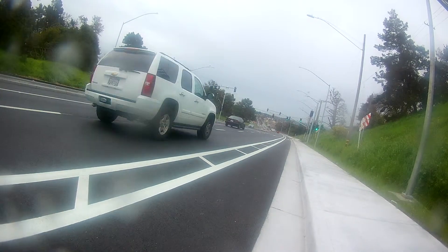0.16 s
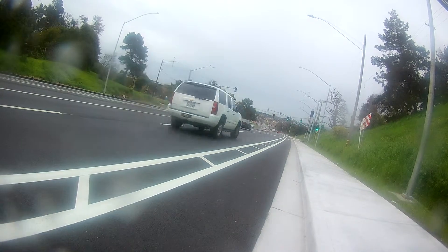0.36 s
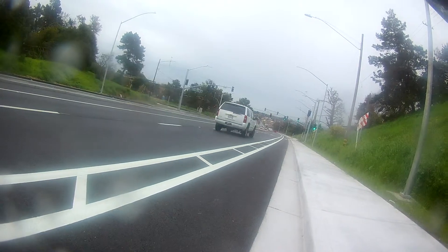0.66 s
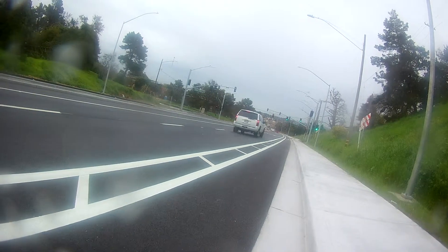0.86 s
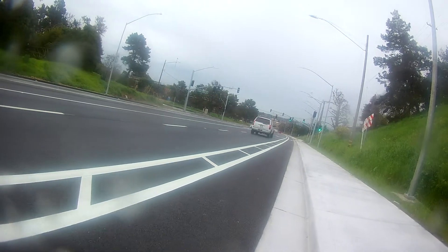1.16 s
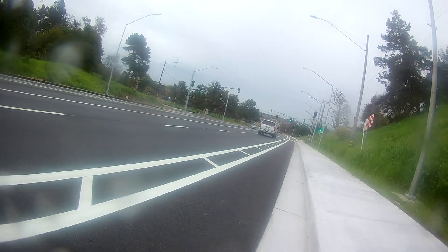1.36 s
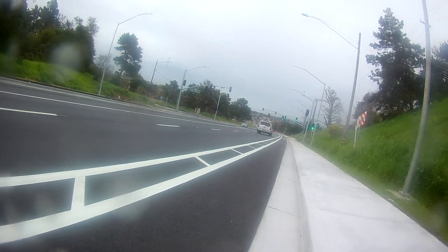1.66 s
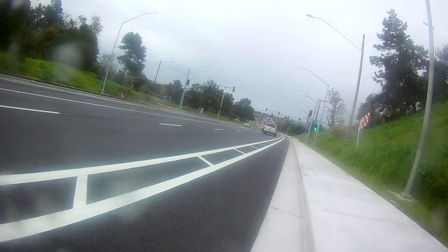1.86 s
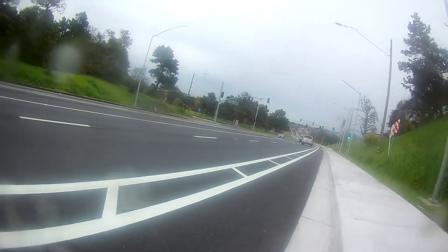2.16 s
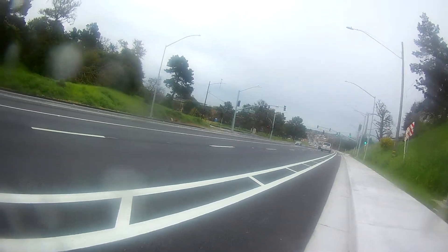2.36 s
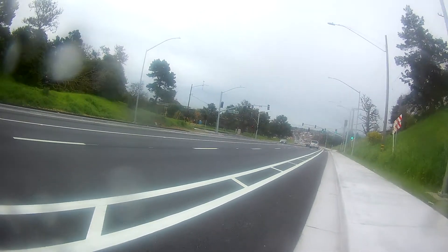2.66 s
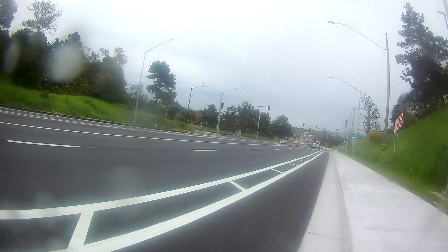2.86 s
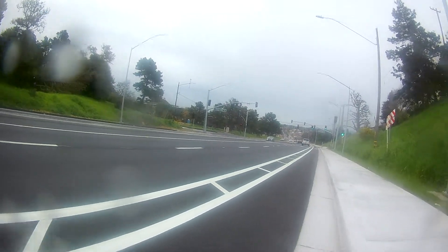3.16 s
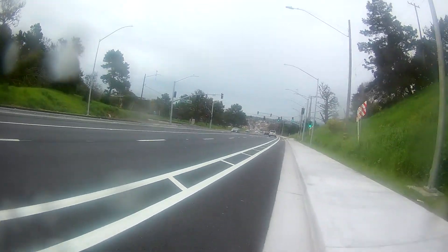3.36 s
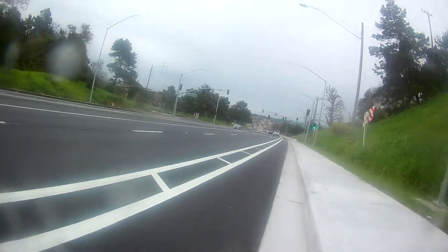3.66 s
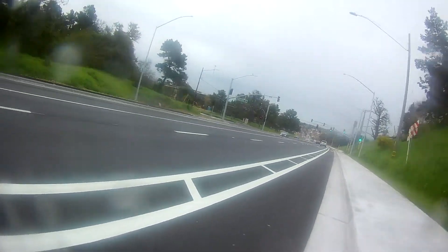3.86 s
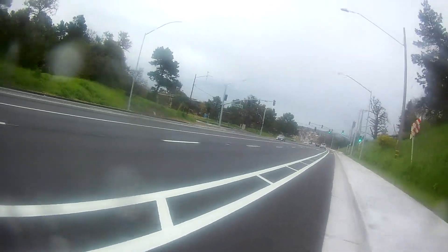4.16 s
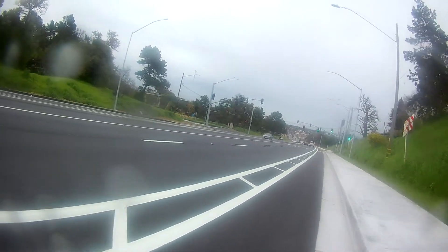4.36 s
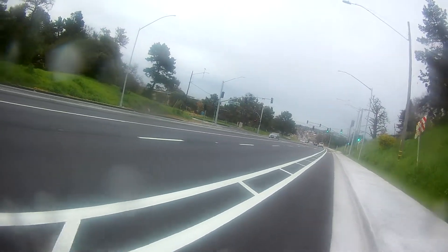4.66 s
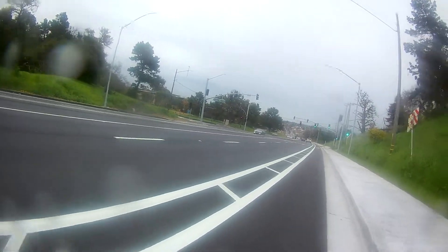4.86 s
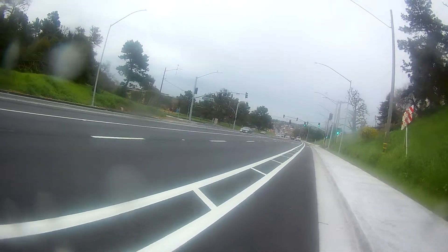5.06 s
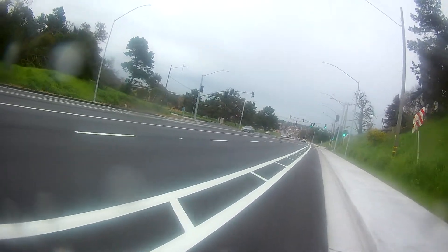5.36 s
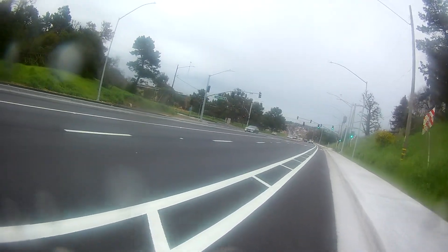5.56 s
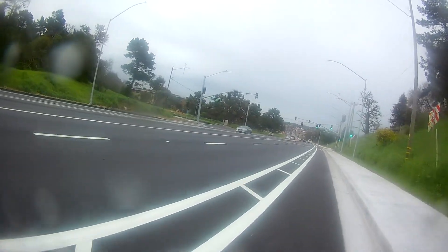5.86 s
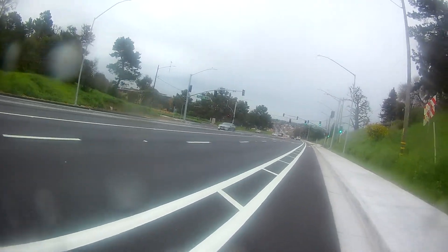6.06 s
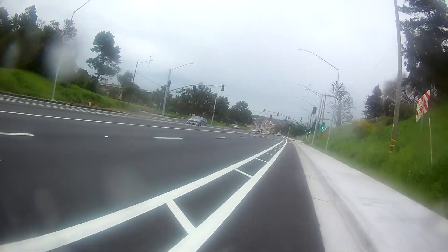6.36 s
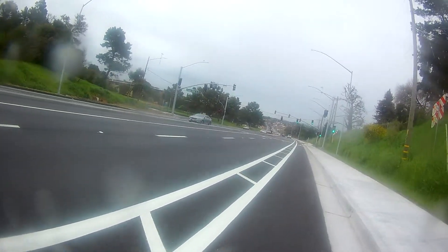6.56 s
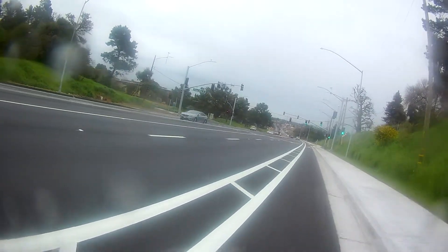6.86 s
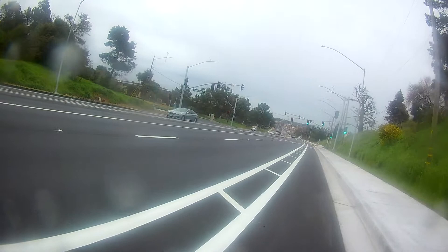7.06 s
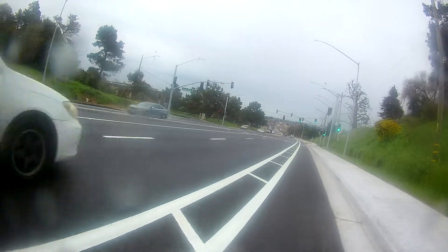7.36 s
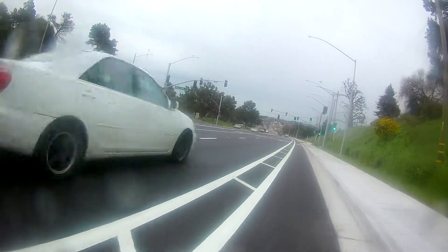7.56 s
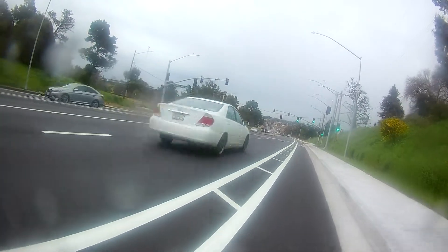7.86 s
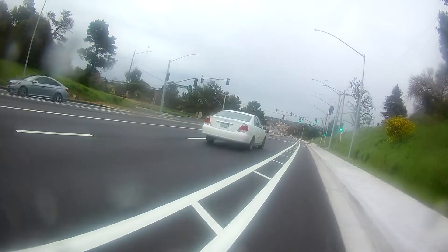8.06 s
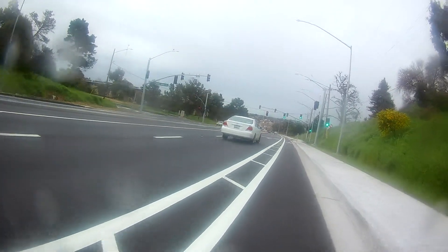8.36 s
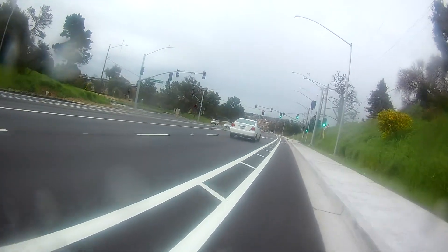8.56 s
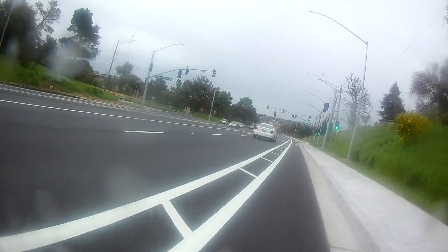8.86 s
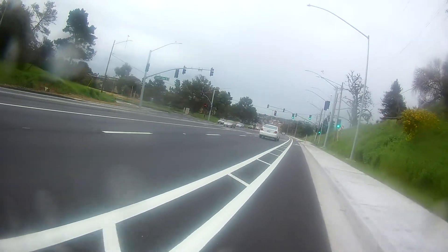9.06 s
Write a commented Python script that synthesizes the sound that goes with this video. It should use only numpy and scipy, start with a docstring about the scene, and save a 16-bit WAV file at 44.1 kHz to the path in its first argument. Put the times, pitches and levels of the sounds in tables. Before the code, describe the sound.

Two cars swish past on a damp road while a rolling bicycle rumbles, rattles and clacks sharply over a bump.

```python
"""A car swishes past about 5 m away, tyres roaring and spray trailing on a damp road.
The microphone rides on a bicycle, inside a camera's closed housing, whose resonances colour everything.
Ever rougher asphalt shakes the frame, bumps make the mount clack and ring, and loose parts rattle.
A second car overtakes as close near the end; two oncoming cars pass in the far lanes, over far traffic."""
import sys
import numpy as np
from scipy import signal
from scipy.fft import rfft, irfft
from scipy.io import wavfile
from scipy.ndimage import uniform_filter1d

SR = 44100
rng = np.random.default_rng(int(sys.argv[2]) if len(sys.argv) > 2 else 0)


def generate_wav(sig):
    """Save sig (samples, or channels by samples) to the path in sys.argv[1] as 16-bit PCM at SR."""
    pcm = np.round(np.clip(np.atleast_2d(sig).T, -1, 1) * 32767).astype(np.int16)
    wavfile.write(sys.argv[1], SR, pcm)


N = 405719
TIME = np.arange(N) / SR


def undb(db):
    """Decibels to gain."""
    return 10 ** (np.asarray(db) / 20)


def unit(x):
    """Scale to rms 1."""
    return x / np.sqrt(np.mean(x ** 2))


def curves(table):
    """The columns of a table, joined by straight lines in time."""
    times, *columns = np.transpose(table)
    return [np.interp(TIME, times, column) for column in columns]


def walk(rate):
    """Random levels held 1 / rate s and smoothed twice; spread near 1."""
    hold = int(SR / rate)
    steps = rng.standard_normal(2048)[np.arange(N) // hold]
    return np.sqrt(2) * uniform_filter1d(uniform_filter1d(steps, hold), hold)


def add(out, s, x):
    """Mix a short sound in at time s."""
    start = int(s * SR)
    out[start:start + len(x)] += x[:len(out) - start]


# Resonances and notches of the housing around the microphone: (frequency [Hz], width [Hz], lift [dB])
HOUSING_RESONANCES = [(341, 32, -4.5), (380.5, 63, 6.5), (426, 53, -2), (515.5, 20, 6), (578, 40, -4),
                      (623, 70, 5.5), (730, 160, 1), (1092, 32, 4), (1356, 110, 2), (1538, 112, 5.5),
                      (1784, 143, 6.5), (2320, 150, 1.5), (3160, 67, 1), (3227, 330, 6.5), (3830, 68, 4),
                      (4110, 140, 4.5), (4900, 200, 2), (6760, 190, 1)]

def housed(x, spectrum):
    """Give a sound its spectrum and the ring of the housing, as a causal filter."""
    size = 8192
    hz = np.maximum(np.fft.rfftfreq(size, 1 / SR), 1)
    points_hz, points_db = np.transpose(spectrum)
    db = np.interp(np.log(hz), np.log(points_hz), points_db)
    # beyond its ends the spectrum falls away
    db -= 40 * np.log10(np.maximum(hz / points_hz[-1], 1) * np.maximum(points_hz[0] / hz, 1))
    db += sum(lift / (1 + (2 * (hz - f) / width) ** 2) for f, width, lift in HOUSING_RESONANCES)
    cepstrum = irfft(np.log(undb(db)))[:size // 2]
    cepstrum[1:] *= 2  # minimum phase
    response = irfft(np.exp(rfft(cepstrum, size)))
    return signal.fftconvolve(x, response)[:len(x)]


def hiss(spectrum, pitch_ratio=1):
    """Smooth noise heard through the housing, whose resonances stay put when the pitch shifts."""
    return unit(housed(rng.standard_normal(N), [(hz * pitch_ratio, db) for hz, db in spectrum]))


def nearness(along, before, after):
    """1 when a car is abreast of the microphone, falling with distance; reach differs before and after."""
    return 1 / np.hypot(1, along / np.where(along < 0, before, after))


def doppler(spectrum, coming, shift):
    """Tyre noise, higher while a car approaches and lower as it leaves."""
    leaving, nearing = hiss(spectrum, 1 - shift), hiss(spectrum, 1 + shift)
    return np.sqrt((1 - coming) / 2) * leaving + np.sqrt((1 + coming) / 2) * nearing


def whine(hz, blur_hz):
    """Uneven tread blocks sing a blurred tone."""
    phase = 2 * np.pi * np.cumsum(hz) / SR
    return unit(walk(blur_hz) * np.sin(phase) + walk(blur_hz) * np.cos(phase))


# Spectra of a car on the damp road, from outside the housing: (frequency [Hz], level [dB])
TYRE_ROAR = [(25, -11), (80, -25), (165, -1.5), (230, -17), (800, -10), (1150, -8.5), (1450, 0.5),
             (1950, 1.5), (2200, -21.5), (2900, -26.5), (4500, -48.5)]
AIR_RUSH = [(25, 11.5), (80, -4.5), (160, 7), (310, 2), (650, 0.5), (900, 5), (1300, -9), (2000, -20.5)]
FLANK_HISS = [(200, -1.5), (900, -8), (1400, 3.5), (2300, 5), (2650, -7), (2950, -14.5), (4200, -13),
              (4800, -22.5), (5400, -30), (7200, -36), (9000, -61)]
WET_SPRAY = [(1500, 7.5), (2400, -4.5), (2900, -6.5), (3100, -2), (3600, -1.5), (4150, -0.5), (4400, -13.5),
             (5200, -20.5), (8000, -33.5)]
# Two cars overtaking about 5 m off, two oncoming about 20 m off: (time abreast [s], time to cover that
# distance [s], speed past the bike [m/s], roar [dB], air rush [dB], flank hiss [dB], spray [dB],
# tread pitch abreast [Hz], tread whine [dB])
PASSING_CARS = [(.01, .24, 22, -40, -49.5, -48, -55.5, 1079, -55),
                (3.0, 0.76, 30, -64, -68, -82, -88, 1129, -65),
                (7.431, 0.28, 16, -40.5, -52, -48, -58.5, 1077, -66),
                (8.3, .5, 33, -64, -59.5, -83, -89, 1120, -74)]

def cars(roar_lead_s, roar_beam, flank_beam, spray_lag_s, flutter_db):
    """Tyres throw their roar ahead, air rushes and the flank hisses abreast, and spray trails behind."""
    out, air, spray = np.zeros(N), hiss(AIR_RUSH), hiss(WET_SPRAY)
    for s, span_s, speed, roar_db, air_db, flank_db, spray_db, tread_hz, whine_db in PASSING_CARS:
        along = (TIME - s) / span_s
        coming = -along / np.hypot(1, along)  # 1 head-on, 0 abreast, -1 driving away
        mach = speed / 343
        roar = doppler(TYRE_ROAR, coming, .7 * mach)
        roar *= nearness(along + roar_lead_s / span_s, before=1.74, after=0.92) ** roar_beam
        flank = doppler(FLANK_HISS, coming, mach)
        flank *= nearness(along, before=1.6, after=1.4) ** flank_beam
        rush = air * nearness(along, before=0.76, after=0.64)
        trail = spray * nearness(along - spray_lag_s / span_s, before=0.37, after=1.15)
        tread = whine(tread_hz * (1 + mach * coming), blur_hz=130.1)
        tread *= nearness(along, before=.8, after=1.1)
        out += undb(roar_db) * roar + undb(air_db) * rush + undb(flank_db) * flank
        out += undb(spray_db) * trail + undb(whine_db) * tread
    return out * undb(flutter_db * walk(16))


def grit(rate, spread_db):
    """Stones of the asphalt striking the tyres: many small kicks, a few large."""
    hit = rng.random(N) < rate / SR
    return hit * rng.standard_normal(N) * undb(spread_db * np.minimum(rng.exponential(size=N), np.pi))


def struck(modes, t, focus_hz, width_hz):
    """Modes decay after a blow; where it lands decides which answer most."""
    out = np.zeros(len(t))
    for hz, db, t60 in modes:
        off_focus_db = 20 * np.log10(np.hypot(1, (hz - focus_hz) / width_hz))
        out += undb(db - off_focus_db - 60 * t / t60) * np.sin(2 * np.pi * hz * t)
    return out


# The camera's sway on its mount; the ring of handlebar and clamp: (frequency [Hz], level [dB], t60 [s])
MOUNT_MODES = [(80.8, -1, 0.24), (100, -1.5, .07), (138.6, -2.5, 0.17), (159.5, 4, 0.095),
               (211.4, 2.5, 0.13)]
BAR_MODES = [(478, 4.5, 0.11), (635.3, -1.5, 0.31), (688.6, 8, 0.13), (800, -7.5, 0.94), (811, 0, 0.2),
             (925, 7, 0.056), (1113, -8.5, 0.087), (1300, -2.5, 0.02), (1480, 0.5, 0.032), (1716, 6, 0.021)]
# Spectra of the road's shaking, carried up the bike to the microphone: (frequency [Hz], level [dB])
ROAD_RUMBLE = [(12, -35), (20, 1), (38, -21.5), (63, -2), (81, -0.5), (119, -6.5), (154, -4), (184, -17.5),
               (221, -5), (330, -32), (430, -68), (730, -120)]
FRAME_BUZZ = [(150, 9.5), (310, -3), (650, 3.5), (900, 3.5), (1200, -4.5), (1800, -14.5), (2300, -23.5),
              (3300, -31.5), (4100, -37), (4800, -42)]
# The road grows rougher under the tyres: (time [s], relative rumble [dB], relative buzz [dB])
ROAD_ROUGHNESS = [(0, -81, -60), (.9, -69, -63), (1.3, -59, -61.5), (1.56, -57, -55.5), (1.8, -63.5, -61.5),
                  (2.15, -57, -54), (2.55, -68, -64), (2.75, -52.5, -58), (3.5, -53, -60.5),
                  (4.1, -47.5, -52.5), (5.1, -49, -55), (5.45, -47, -53.5), (6.2, -46, -52),
                  (6.8, -48, -53.5), (7.9, -46.5, -49.5), (8.6, -46, -49.5), (9.2, -42, -46.5)]

def rolling(rumble_gain_db, buzz_gain_db, bar_db, mount_db):
    """Road grain shakes the mount, buzzes in the frame and keeps the handlebar faintly ringing."""
    rumble_db, buzz_db = curves(ROAD_ROUGHNESS)
    t = TIME[:SR // 2]
    patches = walk(14)  # rougher and smoother patches of asphalt
    jolts, kicks = grit(rate=900, spread_db=2.5), grit(rate=3000, spread_db=1.0)
    shoves = grit(rate=400, spread_db=4.5)
    sway = signal.fftconvolve(shoves, struck(MOUNT_MODES, t, focus_hz=75, width_hz=27))[:N]
    bar = signal.fftconvolve(kicks, struck(BAR_MODES, t, focus_hz=574, width_hz=350))[:N]
    rumble = unit(housed(jolts, ROAD_RUMBLE)) + undb(mount_db) * unit(sway)
    rumble *= undb(rumble_db + rumble_gain_db + 0.87 * patches)
    buzz = unit(housed(kicks, FRAME_BUZZ)) + undb(bar_db) * unit(bar)
    buzz *= undb(buzz_db + buzz_gain_db + 0.76 * patches + 0.45 * walk(45))
    return rumble + buzz


# Tyre roar from far along the road: (time [s], level [dB])
FAR_TRAFFIC = [(0, -75), (.95, -58.5), (1.75, -72.5), (3.3, -61.5), (5.3, -65), (7.5, -66), (9.2, -62)]

def far_traffic(pitch_ratio):
    """Distant cars, mostly driving away and so a little lower in pitch."""
    return hiss(TYRE_ROAR, pitch_ratio) * undb(curves(FAR_TRAFFIC)[0] + 0.69 * walk(28))


# Spectrum of a knock on the housing, right at the microphone: (frequency [Hz], level [dB])
CLACK_SPECTRUM = [(100, -24), (300, -5.5), (600, 3.5), (1100, 3.5), (1750, -6), (2200, -11.5), (3000, -36),
                  (4400, -16), (5200, -35), (7000, -37), (8200, -47), (14000, -31)]

def clack(t, bright_hz, contact_s, note_hz, chatter_db=-6.5, chatter_s=0.011, hollow_db=-8):
    """A contact swells and dies, loose parts chatter on, and the struck spot adds a hollow note."""
    contact = (t / contact_s) ** 2 * np.exp(2 - 2 * t / contact_s)
    chatter = undb(chatter_db) * np.exp(-t / chatter_s)
    burst = (contact + chatter) * rng.standard_normal(len(t))
    soften = signal.butter(3, bright_hz, fs=SR, output="sos")
    knock = housed(signal.sosfilt(soften, burst), CLACK_SPECTRUM)
    knock += undb(hollow_db) * signal.lfilter(*signal.iirpeak(note_hz, Q=5, fs=SR), knock)
    return knock / np.sqrt(np.sum(knock ** 2) / (contact_s * SR / 2))


# Spectrum of that knock's sharp edge, just as close: (frequency [Hz], level [dB])
TICK_SPECTRUM = [(2200, 10.5), (3000, 8.5), (4400, -1), (5300, -8), (6000, -7), (7300, -13), (8200, -27),
                 (11000, -24), (14000, -30)]

def tick(t, bright_hz, decay_s=0.0031, hard_hz=4000, db_per_octave=8):
    """The sharp edge of a contact on the housing: the harder the contact, the louder."""
    edge = housed(np.exp(-t / decay_s) * rng.standard_normal(len(t)), TICK_SPECTRUM)
    hardness = undb(db_per_octave * np.log2(bright_hz / hard_hz))
    return hardness * edge / np.sqrt(np.sum(edge ** 2) / (decay_s * SR / 2))


# Bumps that jolt the mount under the microphone: (time [s], clack [dB], brightness [Hz],
# contact time [s], sway gain [dB], sway focus [Hz], ring gain [dB], ring focus [Hz])
ROAD_BUMPS = [(1.107, -35, 1520, 0.0046, -28, 182.5, -48, 1054),
              (1.166, -38, 5030, 0.00091, -40.5, 215, -42, 1760),
              (1.365, -31.5, 2000, 0.0034, -32.5, 150, -45, 1110),
              (1.422, -11.5, 5000, 0.0016, -15.5, 141, -14, 1156),
              (1.424, -10.5, 5500, 0.0018, -20, 205, -10, 1742),
              (2.021, -40, 1230, .011, -24, 111, -35, 470),
              (2.245, -28, 1900, 0.0027, -34, 230, -22.5, 1520),
              (2.247, -26.5, 1400, 0.005, -65, 200, -22.5, 1120),
              (2.686, -34, 1820, 0.0026, -33, 211, -26, 1560), (2.735, -50, 900, .005, -37.5, 80, -53, 710),
              (2.833, -36.5, 1210, 0.0033, -38, 199, -42.5, 660),
              (3.127, -42, 1210, 0.0051, -37, 91, -50.5, 665),
              (4.125, -24.5, 1050, 0.004, -31, 212, -29.5, 942),
              (4.158, -35.5, 900, .0041, -38, 215, -44, 667), (6.269, -43, 1200, .0045, -34, 75, -56, 700),
              (6.837, -36.5, 700, 0.0015, -29.5, 100, -45.5, 480),
              (8.470, -43, 587, 0.0035, -29, 86, -65, 506),
              (9.155, -27.5, 1390, .001, -27, 196, -40.5, 474)]

def bumps(sway_width_hz, ring_width_hz, tick_db, sway_lag_s=0.0085, sway_rise_s=0.004):
    """Each bump clacks the mount against the housing, rings the bar and sets the camera swaying."""
    out, t = np.zeros(N), TIME[:SR // 2]
    late = np.maximum(t - sway_lag_s, 0)  # the camera follows a bump late
    own_note = undb(-17) * struck(BAR_MODES, t, focus_hz=648, width_hz=18.5)  # answers every bump
    for s, clack_db, bright_hz, contact_s, sway_db, sway_hz, ring_db, ring_hz in ROAD_BUMPS:
        hit = clack(t, bright_hz, contact_s, ring_hz) + undb(tick_db) * tick(t, bright_hz)
        sway = struck(MOUNT_MODES, late, sway_hz, sway_width_hz) * (1 - np.exp(-late / sway_rise_s))
        bar = undb(ring_db) * struck(BAR_MODES, t, ring_hz, ring_width_hz) + undb(clack_db) * own_note
        bar *= 1 - np.exp(-2 * t / contact_s)  # the ring builds during the contact
        add(out, s, undb(clack_db) * hit + undb(sway_db) * sway + bar)
    return out


# Light rattles close to the microphone: (time [s], level [dB], brightness [Hz])
LOOSE_RATTLES = [(1.136, -38, 1510), (1.412, -30.5, 2500), (1.755, -44.5, 3200), (1.949, -41, 2740),
                 (1.967, -43, 3500), (2.008, -38.5, 1280), (2.024, -44, 3500), (2.147, -34.5, 2800),
                 (2.790, -39.5, 1600), (3.181, -42, 1200), (4.395, -45.5, 1500), (8.928, -44, 1215)]

def rattles(tick_db, note_hz, contact_s, ring_db):
    """Loose parts click on the housing and ring the bar faintly, too light to sway the camera."""
    out, t = np.zeros(N), TIME[:SR // 2]
    bar = undb(ring_db) * struck(BAR_MODES, t, focus_hz=464, width_hz=44)
    for s, db, bright_hz in LOOSE_RATTLES:
        click = clack(t, bright_hz, contact_s, note_hz) + undb(tick_db) * tick(t, bright_hz)
        add(out, s, undb(db) * (click + bar))
    return out


def hum(hz, peak_s, swell_s, db):
    """A brief, wavering low hum swells in the rumble."""
    swell = np.exp(-((TIME - peak_s) / swell_s) ** 2)
    return undb(db) * swell * np.sin(2 * np.pi * hz * TIME + 0.8 * walk(27))


def scene():
    """The bicycle under the microphone and the traffic around it, in mono."""
    bike = rolling(rumble_gain_db=0.3, buzz_gain_db=-2.27, bar_db=-17.5, mount_db=-5)
    bike += hum(hz=103.1, peak_s=3.79, swell_s=.095, db=-41)
    bike += bumps(sway_width_hz=12.8, ring_width_hz=20, tick_db=-25)
    bike += rattles(tick_db=-18, note_hz=1270, contact_s=0.0019, ring_db=-10)
    traffic = cars(roar_lead_s=0.12, roar_beam=1.92, flank_beam=5.1, spray_lag_s=0.17, flutter_db=0.62)
    traffic += far_traffic(pitch_ratio=0.98)
    return (bike + traffic)[None]


# The microphone's own noise: (frequency [Hz], level [dB])
MIC_NOISE = [(20, 25), (60, -1), (300, 11), (5000, 3.5), (12000, 0.5), (13500, 3.5), (15500, 4.5)]

def record(dry):
    """The microphone adds faint hiss, and the top is cut at 15.8 kHz."""
    noisy = dry + undb(-75.5) * hiss(MIC_NOISE)
    return signal.sosfilt(signal.ellip(10, .2, 70, 15800, fs=SR, output="sos"), noisy)


dry = scene()
out = record(dry)
generate_wav(out)
```